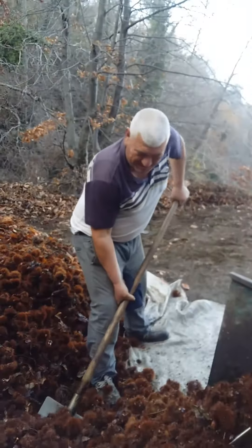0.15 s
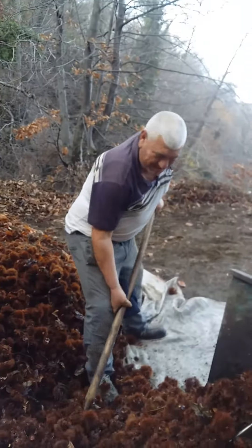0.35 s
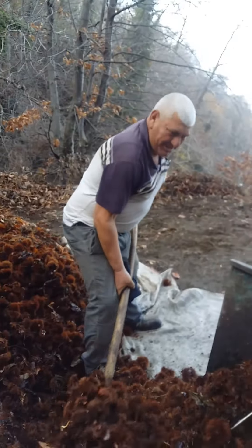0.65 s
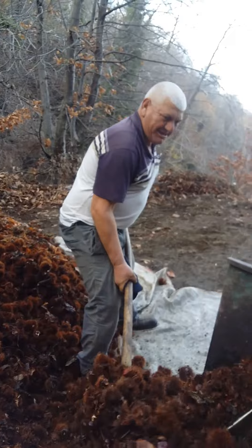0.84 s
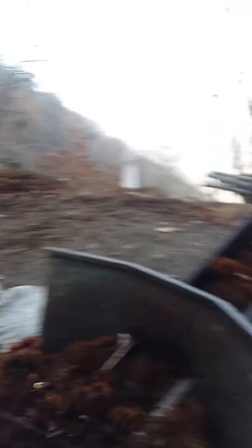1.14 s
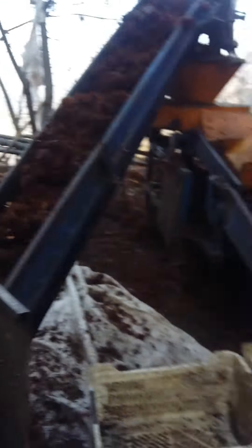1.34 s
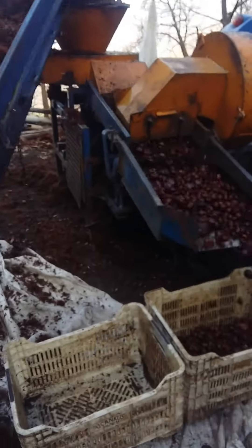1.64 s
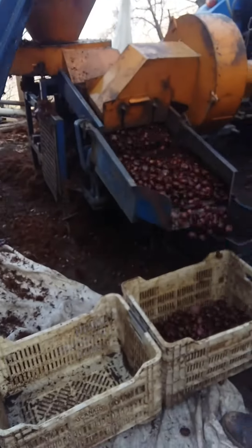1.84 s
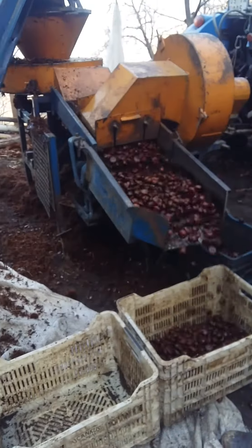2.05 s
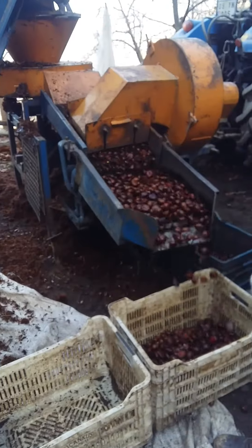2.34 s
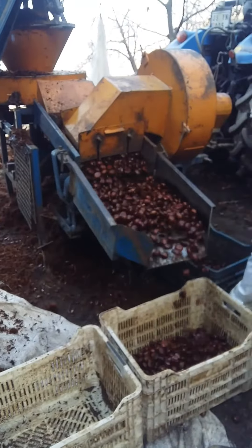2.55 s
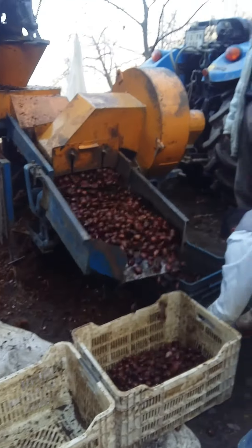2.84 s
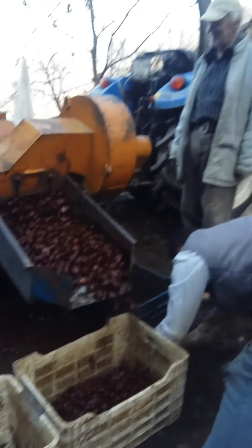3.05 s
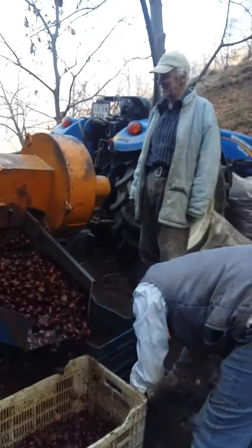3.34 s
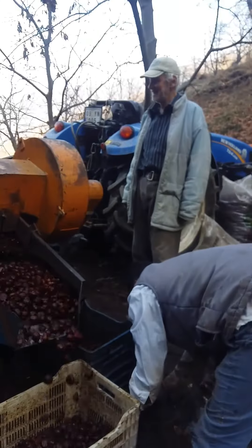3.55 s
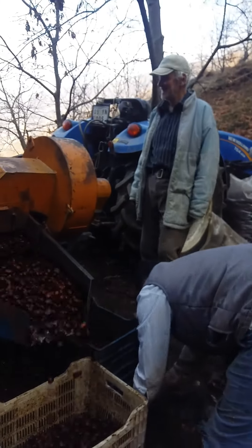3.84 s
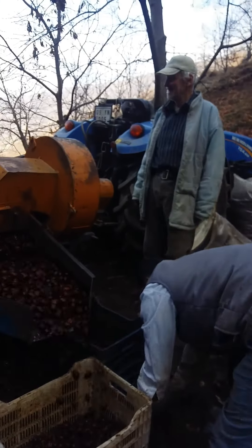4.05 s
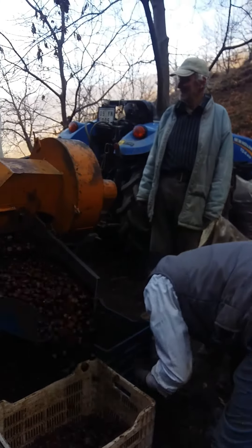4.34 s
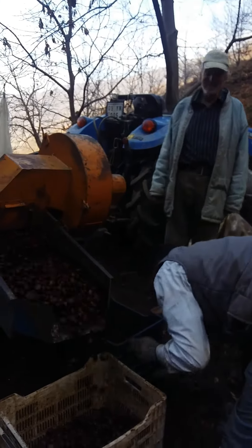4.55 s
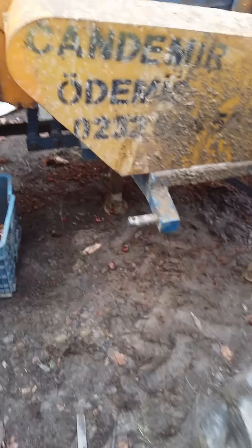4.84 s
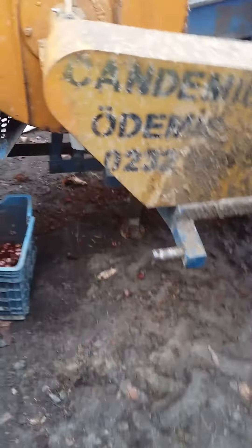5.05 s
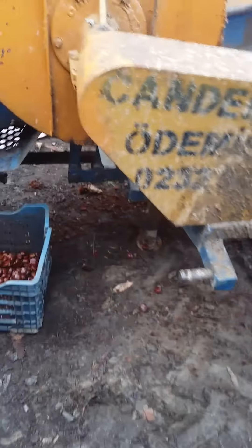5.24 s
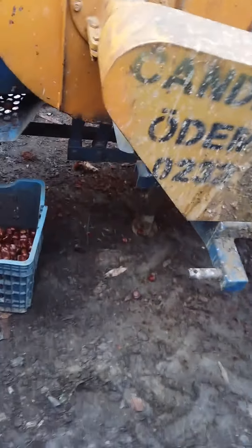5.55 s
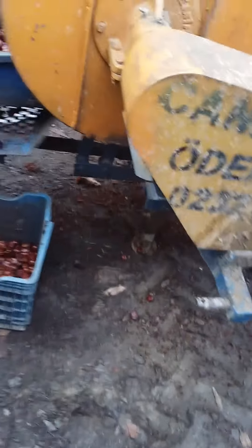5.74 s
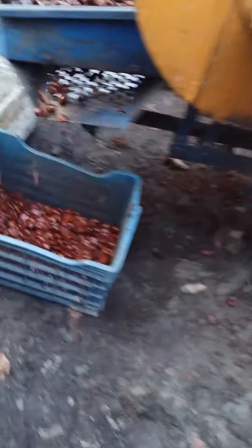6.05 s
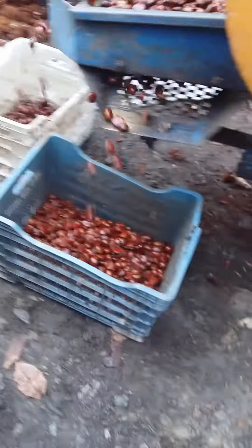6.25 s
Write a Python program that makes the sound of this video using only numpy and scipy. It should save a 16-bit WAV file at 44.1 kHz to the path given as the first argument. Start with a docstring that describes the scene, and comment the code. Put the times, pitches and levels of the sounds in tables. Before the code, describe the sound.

Outdoors, a tractor-driven chestnut husker runs close by, its fan humming and blowing over a low diesel rumble. Burrs knock in the drum, nuts rattle on a shaking steel sieve and dry shells crackle, with occasional sharp strikes. A shovel scrapes softly early on. The sound cuts to a brief silence, then fades back in with less hum and more rushing air and ringing steel.

```python
"""A fan hums and blows over a diesel's rumble: a tractor drives a chestnut husker, outdoors.
Burrs knock about in the drum, nuts rattle on a shaking steel sieve, dry shells crackle, and now and
then a nut strikes hard. Early on a shovel scrapes in the heap. The stereo microphone stands beside
the chute; after a short silence the machine fades in again, heard from behind the fan."""
import sys
import numpy as np
from scipy import signal
from scipy.fft import rfft, irfft, next_fast_len
from scipy.io import wavfile

SR = 44100
rng = np.random.default_rng(int(sys.argv[2]) if len(sys.argv) > 2 else 0)


def generate_wav(signal):
    """Clip the signal to [-1, 1] and save it as 16-bit WAV at the path in sys.argv[1]."""
    frames = np.transpose(np.atleast_2d(signal))
    scaled = np.clip(frames, -1, 1) * 32767
    pcm = np.round(scaled).astype(np.int16)
    wavfile.write(sys.argv[1], SR, pcm)


N = 282681
T = np.arange(N) / SR

# how alike the microphone's two ports are: frequency_hz, coherence
PORT_LIKENESS = [(25, 0.79), (70, 0.88), (160, 1), (330, 0.75), (600, .75), (1200, 0.5), (2500, 0.28),
                 (12000, .25)]
# how far the left port leads the right: frequency_hz, phase_rad
PORT_LEAD = [(60, .05), (160, 0.29), (330, 0.35), (480, 0.9), (800, 0.69), (1900, 1.3), (3500, 3)]


def amp(db):
    """Decibels to gain."""
    return 10 ** (np.asarray(db) / 20)


def unit_rms(x):
    """Scales to an rms of one."""
    return x / np.sqrt(np.mean(x ** 2) + 1e-20)


def at_hz(points, hz):
    """Reads a table on a log-frequency axis."""
    f, value = np.transpose(points)
    return np.interp(np.log(hz + 1), np.log(f + 1), value)


def follow(curve):
    """The columns of a timed table, sample by sample."""
    time_s, *columns = np.transpose(curve)
    return [np.interp(T, time_s, column) for column in columns]


def filtered(x, response):
    """Applies a frequency response, given as a function of Hz."""
    size = next_fast_len(N + 4096)
    return irfft(rfft(x, size) * response(np.fft.rfftfreq(size, 1 / SR)), size)[..., :N]


def coloured(x, spectrum):
    """Gives x a spectrum and an rms of one."""
    return unit_rms(filtered(x, lambda hz: amp(at_hz(spectrum, hz))))


def hump(hz, centre_hz, width):
    """A bell-shaped response on a log-frequency axis."""
    return np.exp(-(np.log((hz + 1) / centre_hz) / width) ** 2)


def drift(rate_hz):
    """A random wander of rms one, with changes up to the given rate."""
    t = T[::100]
    sines = sum(np.sin(2 * np.pi * (hz * t + rng.random())) for hz in rate_hz * rng.uniform(.15, 1, 24))
    return np.interp(T, t, unit_rms(sines))


def microphone(pair, balance):
    """Two unrelated signals become the partly alike left and right; the right gets little treble."""
    size = next_fast_len(N + 4096)
    hz = np.fft.rfftfreq(size, 1 / SR)
    left, other = rfft(pair, size)
    likeness = np.clip(at_hz(PORT_LIKENESS, hz), 0, 1)
    shade = amp(-at_hz(balance, hz))
    shared = shade * likeness * np.exp(-1j * at_hz(PORT_LEAD, hz))
    own = shade * np.sqrt(1 - likeness ** 2)
    mid_gain = np.sqrt(abs(1 + shared) ** 2 + own ** 2) / 2
    return irfft(np.array([left, shared * left + own * other]) / mid_gain, size)[:, :N]


def tone(turns, db, balance, waver):
    """One partial at both microphone ports, wavering in size and phase."""
    hz = (turns[-1] - turns[0]) / T[-1]
    right = amp(-at_hz(balance, hz)) * np.exp(-1j * at_hz(PORT_LEAD, hz))
    wobble = 1 + waver * (drift(rate_hz=24) + 1j * drift(rate_hz=22))
    phasor = amp(db) * np.exp(2j * np.pi * turns) * wobble
    return np.sqrt(2) * np.array([phasor.real, (phasor * right).real]) * 2 / abs(1 + right)


def fan(blades, speed_hz, shake, hum, bite_db, balance):
    """Passing blades hum; the overtones swell at random and the shaker adds a slight throb."""
    # upper harmonics: blade_pass_multiple, level_against_third_db
    overtones = [(4, -9.5), (5, -20), (6, -18), (9, -18)]
    swell_db, swell_hz, throb_db = .78, 5, 1.5
    nominal_hz, bite_db_per_hz = 160, .23  # a faster fan sounds brighter
    housing_hz, half_width_hz, lift_db = 976, 16, 6.5
    hum_db, octave_db = follow(hum)
    octave_db = octave_db + swell_db * drift(swell_hz) + throb_db * shake
    third_db = bite_db + bite_db_per_hz * (speed_hz - nominal_hz) + swell_db * drift(swell_hz)
    out = tone(blades, hum_db, balance, waver=.04)
    out += tone(2 * blades, octave_db - .4, balance, waver=.12)
    out += tone(3 * blades + 1 / 3, third_db, balance, waver=.043)
    for multiple, db in overtones:
        # a harmonic whines when it meets the resonance of the housing
        whine_db = lift_db * np.exp(-((multiple * speed_hz - housing_hz) / half_width_hz) ** 2)
        out += tone(multiple * blades, third_db + db + whine_db, balance, waver=.079)
    return out * (1 - .03 * shake)


def drive(blades, balance, diesel_db, shafts_db):
    """The tractor's three-cylinder diesel and the husker's shafts, all belted to the fan's speed."""
    # engine tones: crank_multiple, relative_db
    diesel_tones = [(1, -57.5), (1.5, -43.5), (2, -43), (2.5, -41), (4.5, -50)]
    # shaft tones: blade_pass_multiple, relative_db
    shaft_tones = [(.8, -28), (1.399, -50.5), (1.599, -57.5)]
    crank = .235 * blades
    diesel = sum(tone(k * crank, db + diesel_db, balance, waver=.2) for k, db in diesel_tones)
    shafts = sum(tone(k * blades, db + shafts_db, balance, waver=.36) for k, db in shaft_tones)
    return diesel + shafts


def blade_chop(blades, depth):
    """The air stream pulses with every passing blade."""
    return 1 + depth * np.cos(2 * np.pi * (blades + 1 / 3))


def air_rush(blades):
    """Turbulence from the fan, chopped a little by the blades."""
    # spectrum of the air: frequency_hz, relative_db
    spectrum = [(20, -25), (40, -21.5), (60, -5), (105, -5.5), (150, 2), (190, -0.5), (260, 2), (420, -3),
                (700, -7.5), (1100, -14), (2000, -19.5), (7000, -67)]
    air = rng.standard_normal((2, N)) * blade_chop(blades, depth=.26)
    return coloured(air * amp(.37 * drift(rate_hz=55)), spectrum)


def impacts(per_s, spread_db, decay_s, scrape_db):
    """Many small blows of uneven size, each a burst that dies quickly, over steady scraping."""
    sizes = amp(spread_db * np.minimum(rng.exponential(1, N), 4))
    hits = rng.random(N) < per_s / SR
    power = signal.lfilter([1], [1, -np.exp(-2 / (decay_s * SR))], sizes ** 2 * hits)
    return np.sqrt(power / power.mean() + amp(scrape_db) ** 2) * rng.standard_normal((2, N))


def pings(per_s, low_hz, high_hz, t60_s, spread_db):
    """Blows on sheet steel: each spot rings briefly at its own pitch."""
    t, out = T[:5000], np.zeros((2, N + 5000))
    span_hz = high_hz - low_hz
    for when, pitch, size, left, right in rng.random((int(per_s * N / SR), 5)):
        envelope = amp(-spread_db * np.log(size + .03)) * np.exp(-np.log(1000) * t / t60_s)
        ring = envelope * np.sin(2 * np.pi * (low_hz + pitch * span_hz) * t)
        out[:, int(when * N):][:, :len(t)] += np.outer([left + .5, 2 * right - 1], ring)
    # as strong per Hz as white noise of rms one
    return np.array([unit_rms(side) for side in out[:, :N]]) * np.sqrt(span_hz / (SR / 2))


def drum(blades):
    """Burrs knock against beaters and casing; the sound pulses with the air that carries it out."""
    # spectrum of the knocking: frequency_hz, relative_db
    spectrum = [(200, -30), (550, 4.5), (760, 0.5), (880, -2.5), (980, -1), (1080, -1), (1600, -3),
                (1900, -7), (2400, -12), (3500, -17.5), (8000, -70)]
    knocks = impacts(per_s=260, spread_db=2.5, decay_s=.01, scrape_db=-3)
    casing = pings(per_s=110, low_hz=600, high_hz=2400, t60_s=.11, spread_db=1.5)
    return coloured((knocks + amp(-2) * casing) * blade_chop(blades, depth=.14), spectrum)


def steel_ring(x, ring_db, patchy_db=4):
    """Adds the modes of the steel; how strongly each one rings depends on where the nuts land."""
    # modes of sieve and housing: pitch_hz, width_hz, relative_db
    steel_modes = [(1850, 72, 4.5), (3680, 50, -5.5), (3925, 4.1, -1), (4034, 43, -0.5), (4610, 32, -11),
                   (4860, 10, 3), (5385, 11, 5), (5810, 50, -4.5), (8090, 29, -0.5)]
    ring = 0
    for hz, width_hz, db in steel_modes:
        blows = x * amp(patchy_db * drift(rate_hz=9.2))
        ring += amp(db) * signal.lfilter(*signal.iirpeak(hz, hz / width_hz, fs=SR), blows)
    return x + amp(ring_db) * ring


def sieve(shake, spectrum, ring_db):
    """Each stroke of the sieve tosses nuts onto the steel."""
    nuts = impacts(per_s=420, spread_db=3, decay_s=.006, scrape_db=3)
    plate = pings(per_s=220, low_hz=2000, high_hz=5900, t60_s=.13, spread_db=1.8)
    rattle = coloured((nuts + amp(.5) * plate) * amp(shake), spectrum)
    return unit_rms(steel_ring(rattle, ring_db))


def shell_crackle(shake):
    """Dry shells and spines tick and snap, a little more at each toss of the sieve."""
    # spectrum of the snaps: frequency_hz, relative_db
    spectrum = [(2000, -32), (6500, 3.5), (8000, 1), (9300, -3), (11300, -4.5), (12400, -11.5),
                (13400, -12.5), (14400, -9.5), (15300, -16.5)]
    snaps = impacts(per_s=240, spread_db=3.2, decay_s=.004, scrape_db=0)
    return coloured(snaps * amp(1.2 * shake), spectrum)


def clunks(rise_s=.001, decay_s=.004):
    """A hard lump hits the drum: a short dull burst around the pitch of the spot it strikes."""
    # blows on the drum: start_s, relative_db, pitch_hz
    blows = [(0.159, -14, 927), (0.362, -18, 1050), (0.642, -9, 1100), (0.739, -11, 997),
             (0.937, -19, 1020), (1.558, -14.5, 1125), (1.88, -8.5, 799), (2.209, -12, 794.7),
             (2.506, -12, 1343), (2.663, -11, 1120), (3.125, -10, 1010), (3.299, -15, 944),
             (3.931, -12, 913), (4.352, -10, 984), (4.402, -13.5, 1240), (4.495, -21.5, 1114)]
    t, out = T[:2048], np.zeros((2, N))
    hz = np.fft.rfftfreq(len(t), 1 / SR)
    # the soft husk blunts the start of the blow
    envelope = (1 - np.exp(-(t / rise_s) ** 2)) * np.exp(-t / decay_s)
    for start_s, db, pitch_hz in blows:
        burst = irfft(rfft(rng.standard_normal((2, len(t)))) * hump(hz, pitch_hz, width=.7))
        out[:, round(start_s * SR):][:, :len(t)] += amp(db - 6) * unit_rms(burst) * envelope
    return out


def shovel():
    """A shovel pushes into the heap of burrs: short rough swells of noise, each around one pitch."""
    # pushes: middle_s, length_s, level_db, pitch_hz
    pushes = [(0.291, 0.11, -28, 1100), (0.993, 0.09, -27.5, 990), (1.093, 0.048, -20.5, 419),
              (1.118, 0.08, -28.5, 1050)]
    out = np.zeros((2, N))
    for middle_s, length_s, db, pitch_hz in pushes:
        scrape = filtered(rng.standard_normal((2, N)), lambda hz: hump(hz, pitch_hz, width=.38))
        out += amp(db) * unit_rms(scrape) * np.exp(-(2 * (T - middle_s) / length_s) ** 2)
    return out


def nut_strikes(crack_s=.0012, scatter_s=.0131, scatter_db=-11):
    """A nut strikes the steel hard: a sharp crack and a brief scatter of its neighbours."""
    # single nuts: start_s, relative_db
    hits = [(0.2882, -19), (0.304, -20.5), (0.3757, -30), (0.5374, -24), (0.772, -23.5), (0.9817, -20.5),
            (1.2079, -29), (1.343, -26), (1.4163, -23), (1.543, -18.5), (1.7739, -16), (1.802, -22),
            (2.5738, -22), (2.663, -21), (2.6977, -21), (2.7978, -19), (3.3989, -16), (3.6381, -18),
            (3.6605, -17.5), (3.687, -18), (3.7045, -26), (4.1874, -25.5), (4.3543, -23), (4.5384, -24),
            (5.5226, -20), (5.7611, -16.5), (5.927, -27), (6.0907, -18), (6.2717, -14), (6.2834, -14),
            (6.3533, -18.5)]
    # crack of a shell on steel: frequency_hz, gain_db
    spectrum = [(300, -18), (1200, 4), (4000, 3.5), (5500, -1.5), (7000, -5), (10000, -24), (15000, -25.5)]
    t, out = T[:3000], np.zeros((2, N))
    envelope = np.exp(-t / crack_s) + amp(scatter_db) * np.exp(-t / scatter_s)
    for start_s, db in hits:
        start = round(start_s * SR)
        burst = amp(db - 1) * envelope * rng.standard_normal((2, len(t)))
        out[:, start:start + len(t)] += burst[:, :N - start]
    cracks = filtered(out, lambda hz: amp(at_hz(spectrum, hz)))
    return steel_ring(cracks, ring_db=1.5)


def husker(speed, hum, crop, rattle, balance, events, toss_phase,
           bite_db, ring_db, diesel_db, shafts_db, rush_db):
    """The whole machine from one microphone position; toss_phase is in turns of the shaker."""
    blades_per_shake = 18.08
    speed_hz = follow(speed)[0]
    blades = np.cumsum(speed_hz) / SR  # count of blade passes
    blades -= np.interp(speed[0][0], T, blades)
    shake = np.cos(2 * np.pi * (blades / blades_per_shake - toss_phase))
    drum_db, sieve_db, crackle_db = follow(crop)
    clumps = drift(rate_hz=7)  # the crop comes through in random clumps
    noise = amp(rush_db) * air_rush(blades) + events
    noise += amp(drum_db - .83 + .54 * clumps) * drum(blades)
    noise += amp(sieve_db + .26 + .43 * clumps) * sieve(shake, rattle, ring_db)
    noise += amp(crackle_db + 3 + clumps) * shell_crackle(shake)
    tones = fan(blades, speed_hz, shake, hum, bite_db, balance)
    tones += drive(blades, balance, diesel_db, shafts_db)
    return tones + microphone(noise, balance)


def beside_chute(events):
    """Microphone beside the chute, where the hum is strong."""
    # fan speed, sagging under load: time_s, blade_pass_hz
    speed = [(0.03, 162.1), (0.36, 158.1), (0.64, 159.7), (0.96, 160.1), (1.19, 154.2), (1.48, 160),
             (2.3, 159.1), (2.47, 160.3), (2.64, 158), (3.38, 163.1), (3.55, 163.2), (4.05, 164.5),
             (4.52, 159.8)]
    # fan hum: time_s, blade_pass_db, octave_db
    hum = [(0.03, -11, -22.5), (0.4, -11.5, -25.5), (1.04, -12, -19.5), (1.15, -12, -33), (1.36, -9.5, -24),
           (1.69, -10.5, -16.5), (1.78, -12.5, -22.5), (1.98, -11.1, -17.5), (2.3, -11, -26.5),
           (2.47, -11.8, -20.3), (2.76, -11.5, -26), (3.51, -10.5, -18), (4.52, -12.1, -17.5)]
    # flow of the crop, as relative levels: time_s, drum_db, sieve_db, crackle_db
    crop = [(0, -25.5, -29.5, -55.5), (.85, -26.5, -31, -57), (1.15, -25.5, -29.5, -53),
            (1.7, -27.5, -31, -52.5), (3.0, -28, -31.5, -54), (3.4, -26, -31.5, -52),
            (4.05, -28.5, -32, -53.5), (4.45, -24.5, -30, -52)]
    # nuts on the sieve: frequency_hz, relative_db
    rattle = [(600, -38.5), (1800, -4.5), (2250, -3), (2700, -2.5), (3300, -1.5), (3950, 0.5), (4400, -2),
              (4800, -3), (5550, -6.5), (6050, -12.5), (7200, -20.5), (15000, -55.5)]
    # port balance: frequency_hz, left_minus_right_db
    balance = [(60, -2), (91, 3), (140, -2), (210, 3.5), (320, 2.5), (490, 7), (750, 6), (1140, 5),
               (1740, 11.5), (2650, 14.5), (4040, 26.5), (6150, 19.5)]
    return husker(speed, hum, crop, rattle, balance, events, toss_phase=.46,
                  bite_db=-26.5, ring_db=-4, diesel_db=-2.5, shafts_db=-2, rush_db=-23)


def behind_fan(events):
    """Microphone behind the fan: less hum, more air and ringing steel."""
    # fan speed: time_s, blade_pass_hz
    speed = [(5.2, 165.2), (5.72, 166.8), (6.07, 165.1), (6.36, 168.2)]
    # fan hum: time_s, blade_pass_db, octave_db
    hum = [(5.15, -18.5, -27.5), (5.38, -16, -25.5), (5.8, -15.5, -22), (6.15, -12.8, -23.5),
           (6.4, -13.5, -26)]
    # upper harmonics dip as the microphone moves: time_s, third_at_nominal_speed_db
    bite = [(5.4, -26.5), (5.9, -41.5), (6.4, -30)]
    # flow of the crop, as relative levels: time_s, drum_db, sieve_db, crackle_db
    crop = [(5.2, -31, -27.5, -48), (5.45, -30, -24.5, -49), (5.7, -30, -27, -50), (6.4, -26.5, -26.8, -48)]
    # nuts on the sieve: frequency_hz, relative_db
    rattle = [(600, -22), (1800, -6), (2250, -5), (3100, -6.5), (3400, -5.5), (3650, 0), (4150, -2.5),
              (4450, -5), (5300, -5), (5700, -11), (5950, -13), (6700, -20), (7300, -34), (15000, -46)]
    # port balance: frequency_hz, left_minus_right_db
    balance = [(60, 1.5), (91, 1.5), (140, 3.1), (210, 1.9), (320, 9.9), (490, 6.3), (750, 5.5),
               (1140, 8.9), (1740, 12.0), (2650, 13), (4040, 23.4), (6150, 28)]
    return husker(speed, hum, crop, rattle, balance, events, toss_phase=.71,
                  bite_db=follow(bite)[0], ring_db=.5, diesel_db=1, shafts_db=-15, rush_db=-21)


def scene():
    """The sound beside the chute stops dead; after a silence it fades in from behind the fan."""
    stop_s, resume_s, fade_s = 4.58, 5.025, .24
    events = nut_strikes() + clunks() + shovel()
    stop = np.clip((stop_s - T) * 1000, 0, 1)
    fade_in = np.clip((T - resume_s) / fade_s, 0, 1)
    return beside_chute(events) * stop + behind_fan(events) * fade_in


def record(dry, knee=.8, edge_hz=15500):
    """The recorder rounds off the highest peaks and limits the band."""
    headroom = 1 - knee
    over = np.maximum(abs(dry) - knee, 0)
    rounded = dry - np.sign(dry) * (over - headroom * np.tanh(over / headroom))
    band_limit = signal.firwin(511, edge_hz, window=("kaiser", 9), fs=SR)
    return signal.oaconvolve(rounded, band_limit[None], "same")


dry = scene()
out = record(dry)
generate_wav(out)
```